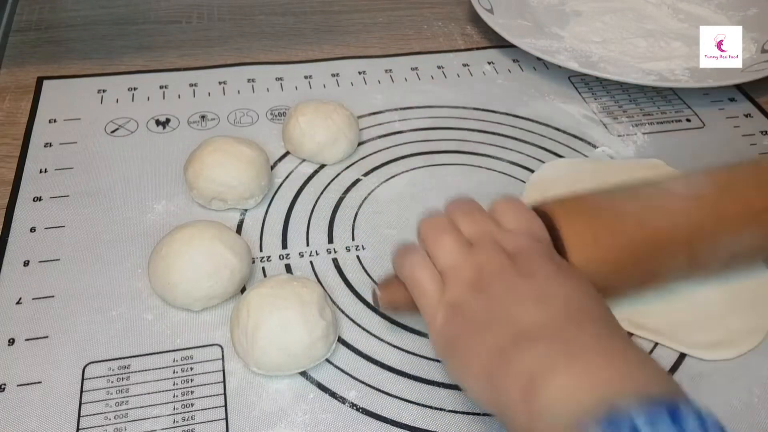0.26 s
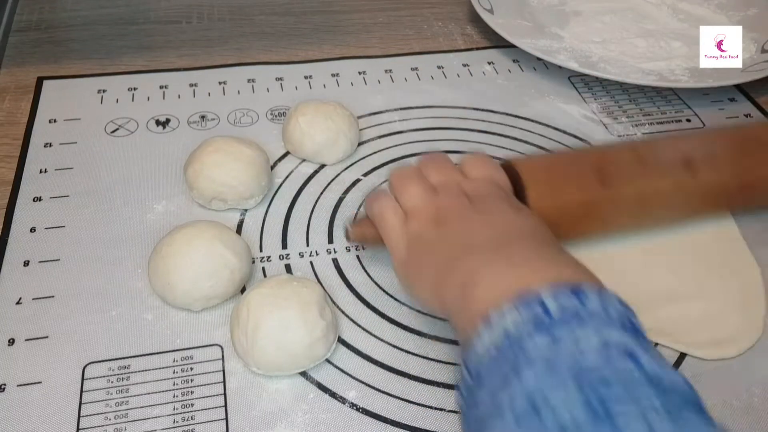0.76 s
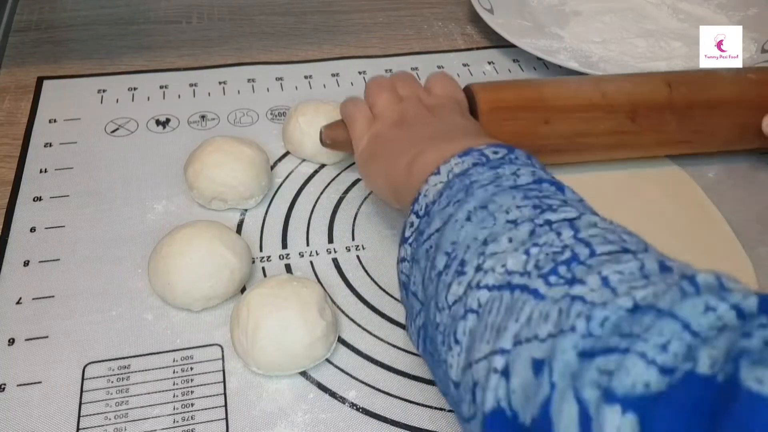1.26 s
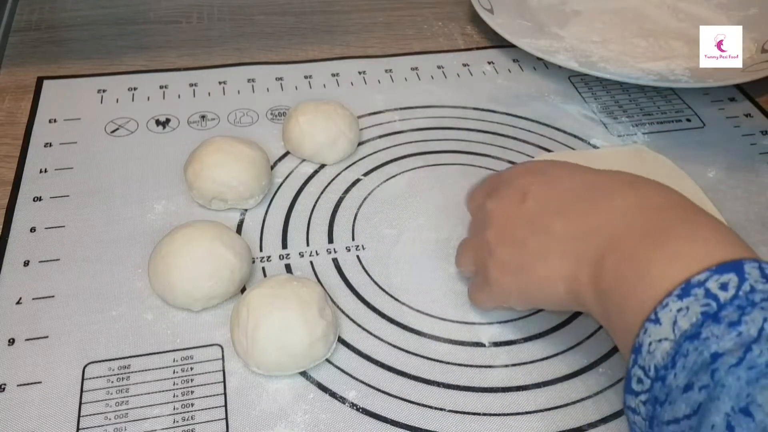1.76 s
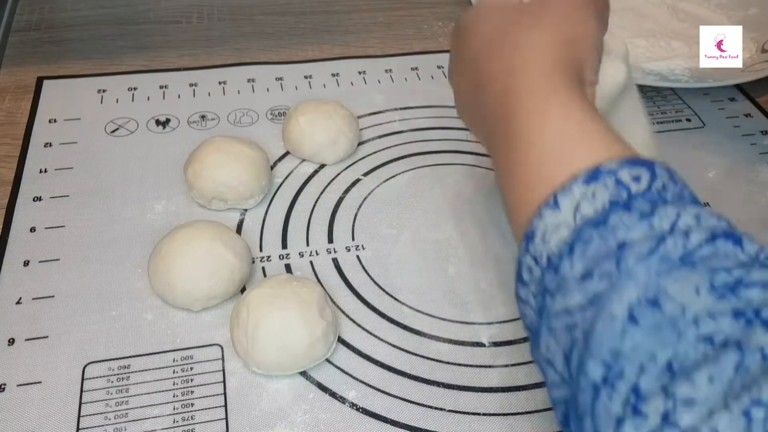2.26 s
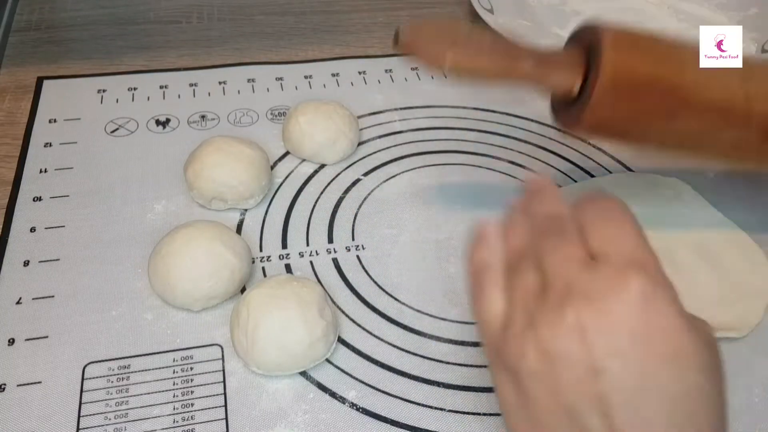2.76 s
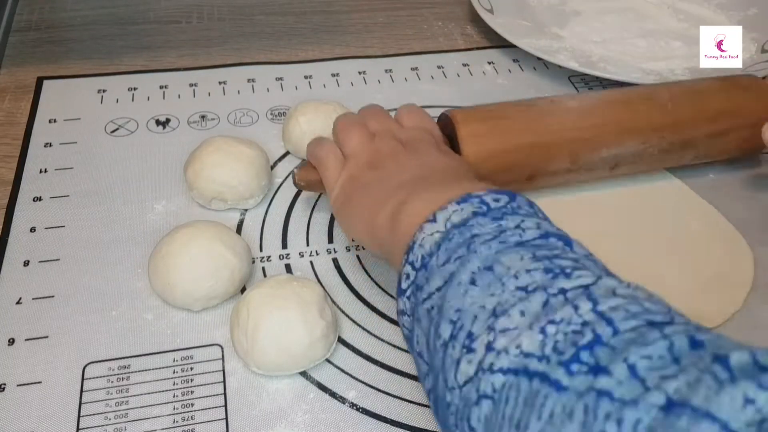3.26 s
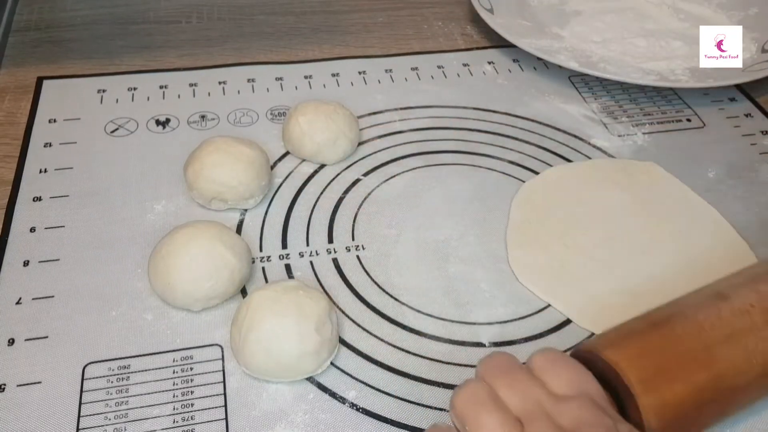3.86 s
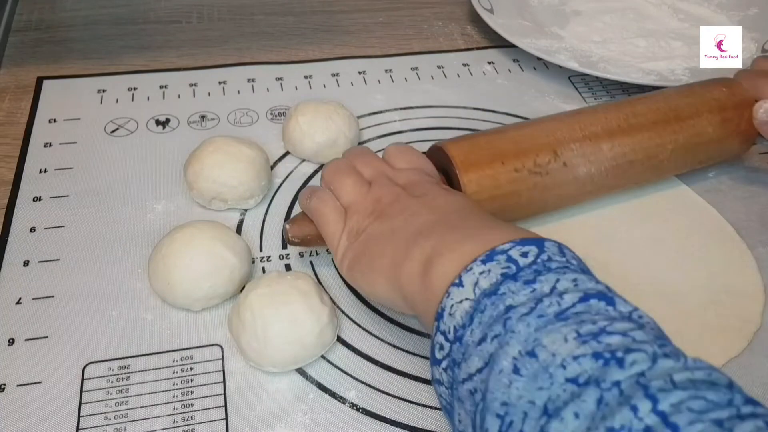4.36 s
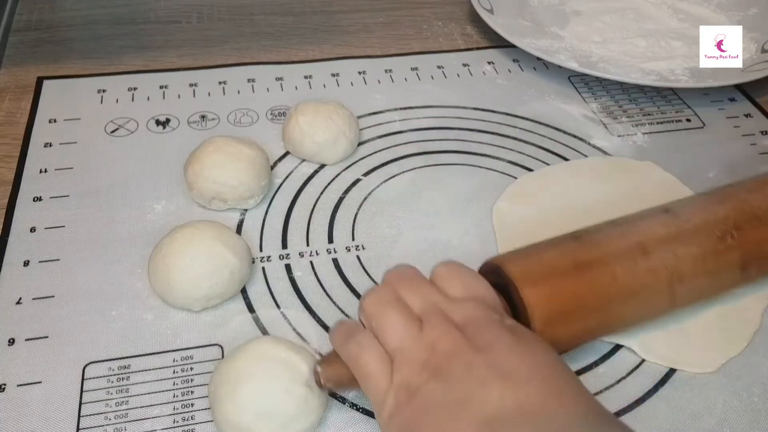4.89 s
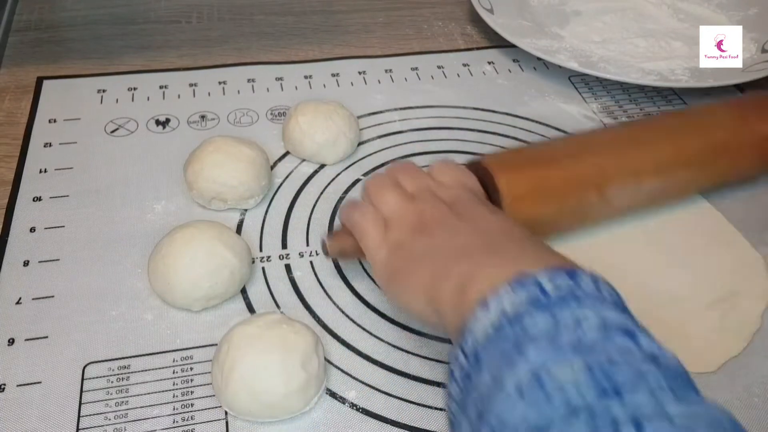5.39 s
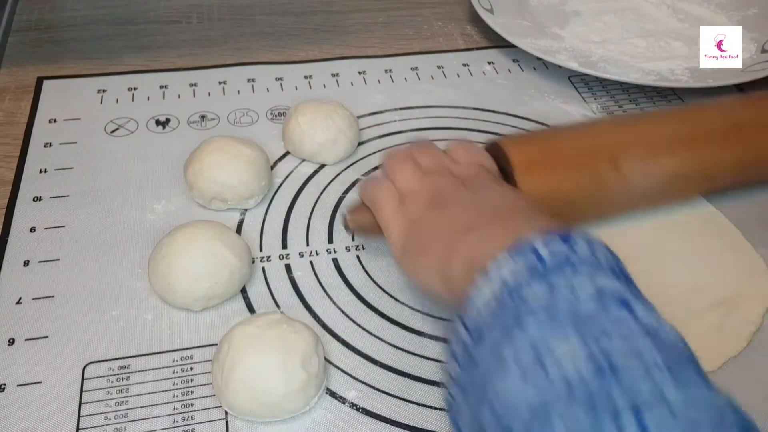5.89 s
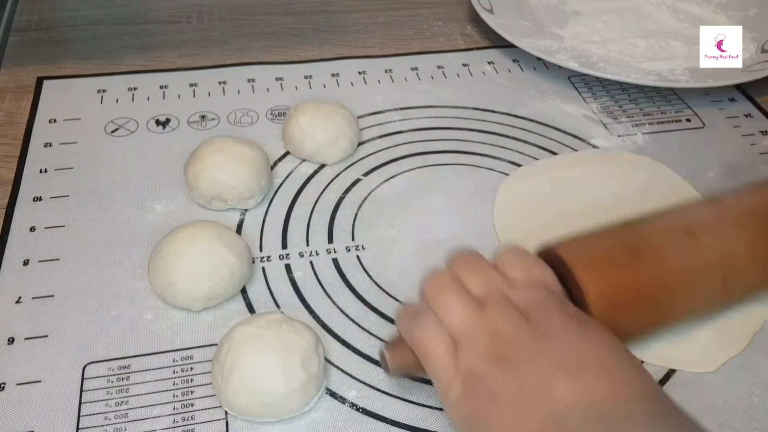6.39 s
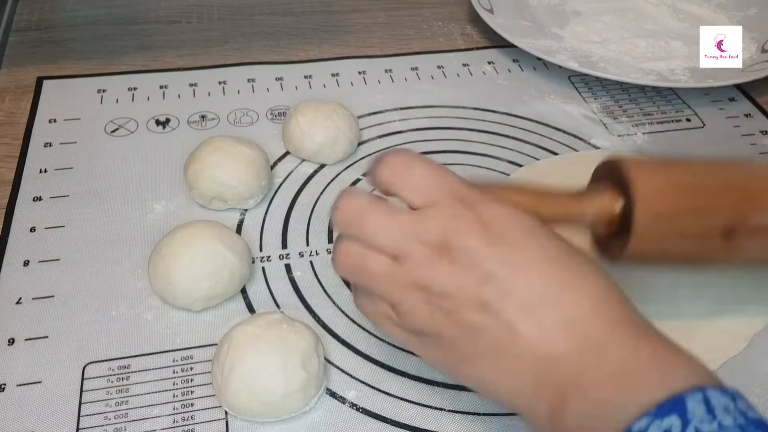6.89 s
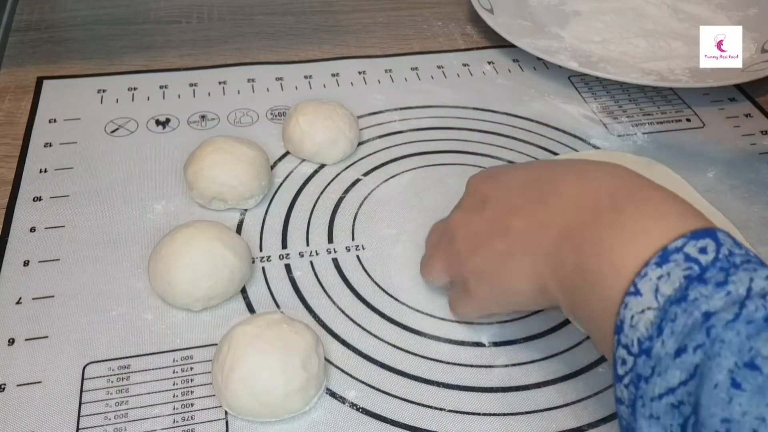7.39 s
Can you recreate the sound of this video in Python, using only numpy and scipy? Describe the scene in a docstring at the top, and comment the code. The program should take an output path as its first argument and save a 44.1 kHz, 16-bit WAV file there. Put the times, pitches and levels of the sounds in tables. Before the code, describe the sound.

A wooden rolling pin rumbles over dough in quick strokes, clacks and knocks on the counter midway, then rolls again with soft swishing.

```python
"""A small kitchen, a stereo pair close to the counter: a wooden pin rolls dough on a silicone mat. First come
quick strokes: the barrel rumbles and bumps over the dough, sleeve and floured mat swish. At 2 s the dough peels
off with a thin hiss and flops back. From 2.9 s the pin is set down and knocked: the wood clacks, the counter
booms, the room rings. At 4.6 s a longer bout of rolling starts; alongside it a soft band of hiss and a faint
narrow tone come and go. After 6.8 s the rolling gives way to a hand brushing the mat over the room's hush."""
import sys
import numpy as np
from scipy import signal
from scipy.fft import rfft, irfft, next_fast_len
from scipy.io import wavfile

SR = 44100
rng = np.random.default_rng(int(sys.argv[2]) if len(sys.argv) > 2 else 0)


def store_pcm(level_fs):
    """Save levels as 16-bit WAV."""
    pcm = np.round(np.clip(level_fs, -1, 1) * 32767).astype(np.int16)
    wavfile.write(sys.argv[1], SR, np.atleast_2d(pcm).T)


N = 336914


# one push or pull of the pin: middle_s, arm_length_s, rumble_db, rubbing_db
STROKES = [(0.061, 0.17, -53.5, -64.5), (0.232, 0.19, -54.5, -70), (0.412, .16, -58.5, -65),
           (0.589, 0.18, -54.5, -65.5), (0.786, 0.18, -60.5, -61), (0.956, 0.18, -58, -67.5),
           (1.158, .18, -57.5, -63), (1.26, 0.19, -67, -69.5), (3.209, .13, -53.5, -60.5),
           (4.65, 0.2, -62.5, -73), (4.807, 0.15, -58.5, -69), (5.006, 0.12, -56, -68),
           (5.2, 0.16, -58, -69.5), (5.386, 0.18, -56.5, -65.5), (5.576, 0.19, -52, -65.5),
           (5.779, .17, -54.5, -64), (5.965, .17, -51.5, -64.5), (6.146, 0.19, -57.5, -65.5),
           (6.229, 0.13, -59.5, -64.5), (6.38, 0.21, -53.5, -64), (6.56, 0.18, -56.5, -65.5),
           (6.744, 0.23, -59.5, -65)]
# a hand brushes the mat, shifting dough or pin: middle_s, length_s, rumble_db, rubbing_db, swish_db
HAND_MOVES = [(1.472, 0.28, -84, -74, -73), (1.729, 0.19, -66, -91, -93), (1.79, 0.19, -80, -94, -76),
              (2.02, 0.33, -83.5, -81, -72.5), (3.08, 0.38, -58.5, -73, -71.5), (3.32, 0.24, -62, -73, -73),
              (3.776, 0.72, -68.5, -73, -73.5), (4.482, 0.31, -69.5, -73.5, -65.5),
              (6.832, 0.36, -87, -67, -64), (7.047, .22, -84, -95, -75), (7.293, 0.39, -76.5, -88, -70.5),
              (7.457, 0.32, -79.5, -80, -70.5), (7.584, 0.12, -73.5, -76.5, -80)]
# spectra of the floured mat and of the sleeve: frequency_hz, density_db
MAT_COLOUR = [(400, -4.5), (700, -5.5), (1100, -3.5), (1750, 1), (2300, -7.5), (3000, -1.5), (4000, -6),
              (6000, -8), (10000, -52)]
SLEEVE_COLOUR = [(2000, -50), (4200, -6.5), (6500, 1), (9000, -1.5), (13000, -0.5), (16000, -4)]

def strokes(rumble_lag_s=0.0058, rumble_stretch=1.46, slide_stretch=1.78, swish_follows=0.68):
    """The arm's speed drives barrel, mat and sleeve; their sounds outlast each stroke and overlap."""
    s, length, rumble_db, rubbing_db = np.transpose(STROKES)
    hand_s, hand_length, hand_rumble_db, hand_rubbing_db, hand_swish_db = np.transpose(HAND_MOVES)
    swish_db = -68.5 + swish_follows * (rubbing_db - rubbing_db.mean())
    weight = swells(s + rumble_lag_s, length * rumble_stretch, rumble_db, power=1.8)
    weight += swells(hand_s, hand_length, hand_rumble_db, power=1.8)
    rub = swells(s, length * slide_stretch, rubbing_db, power=4.96)
    rub += swells(hand_s, hand_length, hand_rubbing_db, power=4.96)
    swish = swells(s, length * slide_stretch, swish_db, power=4.1)
    swish += swells(hand_s, hand_length, hand_swish_db, power=4.1)
    mat = friction(from_db(5.0) * rub, MAT_COLOUR, grain_db=1.0, patchy_db=1.5, pan_db=-2.5)
    sleeve = friction(from_db(5.5) * swish, SLEEVE_COLOUR, grain_db=1.0, patchy_db=1.0, pan_db=-2.0)
    return rolling(weight) + mat + sleeve


# spectrum of the barrel on dough and mat: frequency_hz, density_db
RUMBLE_COLOUR = [(20, 1.5), (45, 1.5), (100, 1.5), (150, -4), (210, -2), (300, -1.5), (450, -8.5),
                 (650, -8.5), (900, -20.5), (1400, -26), (2500, -23), (6000, -72.5)]
# how hard the hands lean on the counter: time_s, bass_gain_db
LEAN = [(0, 2), (1.3, 7.5), (1.75, 5.5), (3.3, 2.5), (4.7, -6), (5.7, -4.5), (6.3, 0.5), (6.7, -3.5),
        (7.3, -7), (7.6, 8.5)]

def rolling(weight, lumpy_db=0.5, mat_db=-0.5, counter_db=-6, deep_hz=140):
    """Uneven dough under the barrel shakes mat and counter, with more bass as the hands lean harder."""
    load = weight * rms_one(from_db(lumpy_db * flutter(35)))
    shake = load * rng.standard_normal(N)
    boom = rms_one(body(COUNTER_MODES, lambda hz: shake)) * np.std(shake)
    rumble = from_db(mat_db) * load * diffuse(RUMBLE_COLOUR) + from_db(counter_db) * boom
    bass = from_db(in_time(LEAN)) * cut(rumble, deep_hz, "low", order=3)
    return pan(bass + cut(rumble, deep_hz, "high", order=3), pan_db=-2.36)


# hard contacts of the pin: start_s, thump_db, thump_hz, knock_db, then wood_db in four zones, low to high
CLACKS = [(2.9335, -29, 95, -29.5, -19.5, -15.5, -8, -17),
          (3.482, -33.5, 148.6, -32, -14.5, -7.5, -13.5, -17.5),
          (3.4961, -60, 152, -50, -19.5, -12, -20, -45),
          (3.5518, -36.5, 103.5, -20.5, -21.5, -19.5, -16.5, -20),
          (4.0774, -26.5, 194.3, -26, -10.5, -13, -12.5, -9.5),
          (4.085, -49, 201, -35.5, -19.5, -12, -8.5, -17), (6.8005, -75, 300, -36, -19, -37.5, -21, -47.5)]
# the wood's bright ring and the hollow knock: pitch_hz, level_db, t60_s
WOOD_MODES = [(1479, -20, 0.072), (1620, -15, 0.05), (1670, -8.5, 0.015), (1877, -18.5, 0.12),
              (2128, -3.5, 0.0075), (2425, -12.5, 0.071), (2840, -6, 0.013), (2883, -5, .036),
              (3065, -5, 0.013), (3460, -6.5, .016), (3914, -9.5, 0.01), (4460, -10.5, 0.0094),
              (5506, -6.5, 0.013), (7794, -12, 0.014)]
HOLLOW_MODES = [(420, -6, 0.012), (558, -3, 0.062), (579.6, 4, 0.027), (619.6, 5, 0.0098),
                (770, -23, 0.0029), (1130, -9, 0.0028)]

def clacks(crack_db=21, zones_hz=(1860, 2400, 3200, 5130)):
    """Wood meets wood: where the pin is struck decides which modes answer; the counter booms below."""
    s, thump_db, thump_hz, knock_db, *wood_db = np.transpose(CLACKS)

    def blow(hz):
        return clicks(s, [at_hz(np.c_[zones_hz, row], hz) for row in np.transpose(wood_db)])

    wood = cut(body(WOOD_MODES, blow), 1100, "high")   # the slim barrel radiates little bass
    wood += from_db(crack_db) * crack(blow)
    hollow = body(HOLLOW_MODES, lambda hz: clicks(s, knock_db))
    counter = thumps(s, thump_db, thump_hz, octave_fall_db=7.5)
    return kitchen(wood + hollow, wet_db=-3.0, build_s=0.00097) + kitchen(counter, wet_db=-12.0)


# spectrum of the crack that opens a clack: frequency_hz, density_db
CRACK_COLOUR = [(800, -25), (1150, -16), (1550, 2), (2900, 7.5), (4000, -6), (6000, -11.5), (8000, -14),
                (9500, -20), (16000, -26)]

def crack(force_at, ring_s=0.0019):
    """Countless short-lived modes of the wood merge into a burst of noise, new for every blow."""
    fade = np.exp(-2 / (ring_s * SR))
    edges_hz = np.geomspace(800, 16000, 12)
    burst = 0
    for low, high in zip(edges_hz, edges_hz[1:]):
        hz = np.sqrt(low * high)
        energy = signal.lfilter([1 - fade], [1, -fade], force_at(hz) ** 2 + 1e-24)
        band = cut(np.sqrt(energy) * rng.standard_normal(N), [low, high], "band")
        burst += from_db(at_hz(CRACK_COLOUR, hz)) * band
    return burst


# resonances of the counter under the mat: pitch_hz, level_db, t60_s
COUNTER_MODES = [(43, -7.5, 0.42), (65, -5, 0.36), (84, -7, 0.23), (107.5, -0.5, .68), (111, -13, .22),
                 (139.9, -8.5, 0.5), (165.4, -10, 0.13), (196.5, 0.5, 0.33), (226, -10, 0.53),
                 (265, -14, 0.017), (318, -0.5, 0.34)]

def thumps(s, db, pitch_hz, octave_fall_db):
    """The counter booms, most strongly in the modes near the pitch of each thump."""
    return body(COUNTER_MODES, lambda hz: clicks(s, db - octave_fall_db * np.abs(np.log2(hz / pitch_hz))))


# barrel and hand bump on dough and mat: start_s, level_db, pitch_hz, t60_s, nudge_db
BUMPS = [(0.164, -44, 474, 0.0045, -50), (0.531, -46.5, 523, 0.0018, -56), (0.896, -50, 450, .005, -53),
         (1.138, -45.5, 363, .005, -62), (1.269, -42.5, 750, 0.0014, -69),
         (1.496, -45.5, 1200, 0.0026, -80), (1.563, -52.5, 450, 0.0071, -62.5),
         (1.687, -51, 248, 0.0087, -54), (3.0081, -47, 199, 0.023, -36), (3.1751, -47, 500, .006, -47),
         (3.826, -26.5, 475.7, 0.011, -51.5), (3.841, -32, 400, 0.017, -58.5),
         (3.858, -35, 516, 0.032, -60.5), (3.878, -44, 820, 0.014, -41.5), (6.112, -39, 950, 0.0036, -55),
         (6.224, -42, 670, 0.0053, -53), (6.327, -57, 300, .008, -52.5), (6.518, -41.5, 809, 0.0034, -91),
         (6.729, -48, 288, 0.013, -68.5)]

def bumps():
    """Cushioned contacts: a dull, briefly ringing pulse that also nudges the counter."""
    pulses = 0
    for s, db, hz, t60, _ in BUMPS:
        pulse = ring(clicks([s], 0), hz, t60)
        pulse = cut(pulse, 1.6 * hz, "low", order=6)
        pulse = cut(pulse, 0.5 * hz, "high", order=1)
        pulses += from_db(db) * pulse / np.abs(pulse).max()
    s, *_, nudge_db = np.transpose(BUMPS)
    return kitchen(pulses, wet_db=-3.0) + thumps(s, nudge_db, pitch_hz=107, octave_fall_db=10.0)


# small sharp ticks of the handle: start_s, level_db
TICKS = [(2.069, -44.5), (2.075, -50), (3.174, -41.5), (3.2633, -26.5), (6.4095, -27.5)]

def ticks(ring_s=0.0015):
    """The handle gives tiny bright snaps, over in a few milliseconds."""
    t = np.arange(SR // 50) / SR
    snap = cut(rng.standard_normal(len(t)) * np.exp(-t / ring_s), 4500, "high", order=1)
    snaps = np.convolve(clicks(*np.transpose(TICKS)), snap / np.abs(snap).max())[:N]
    return kitchen(snaps, wet_db=-4.0)


# spectrum of dough slapping the mat: frequency_hz, density_db
FLOP_COLOUR = [(40, -21), (150, -4.5), (350, -3.5), (500, -5), (700, -5), (950, -5.5), (1300, -1.5),
               (1750, 0.5), (2300, -3.5), (3300, -9), (5000, -17), (9000, -22), (16000, -28)]

def flop(land_s=2.486, slap_db=-38, attack_s=0.0051, decay_s=0.012, settle_s=0.012):
    """Soft dough lands: a dull slap that spreads over a few milliseconds and nudges the counter."""
    t = np.arange(N) / SR - land_s
    envelope = np.exp(-np.maximum(-t / attack_s, t / decay_s))
    slap = from_db(slap_db) * envelope * diffuse(FLOP_COLOUR)[0]
    counter = thumps([land_s + settle_s], db=-48.5, pitch_hz=115, octave_fall_db=3.5)
    return pan(kitchen(slap, wet_db=-8.0), pan_db=-1.0) + counter


# spectrum of the soft band of hiss: frequency_hz, density_db
SOFT_BAND_COLOUR = [(450, -17), (700, 2), (1050, -8), (1400, 0), (1700, -9), (1900, -5.5), (2300, -18),
                    (4000, -14)]

def soft_band():
    """Off to the right a soft, dry band of hiss rises, holds and fades."""
    level = held(start_s=4.58, end_s=5.3, db=-63, attack_s=0.092, release_s=0.062)
    return friction(level, SOFT_BAND_COLOUR, grain_db=1.0, patchy_db=4.0, pan_db=-9.0)


# drift of the narrow band: time_s, pitch_hz
NARROW_BAND_PITCH = [(4.62, 1550), (4.66, 1478), (4.762, 1660), (5.23, 1480), (5.35, 1581), (6.01, 1635),
                     (6.22, 1522)]

def narrow_band(start_s=4.6, waver_hz=14.1, width_hz=220, growth_db_per_s=8):
    """A narrow noise band stands out of the soft hiss and outlasts it, drifting and growing."""
    hz = in_time(NARROW_BAND_PITCH) + waver_hz * flutter(11.96)
    noise = rng.standard_normal((2, N)) + 1j * rng.standard_normal((2, N))
    wobble = cut(noise, width_hz / 2, "low")
    band = rms_one(np.real(wobble * np.exp(2j * np.pi * np.cumsum(hz) / SR)))
    level = held(start_s, end_s=6.25, db=-74.5, attack_s=0.028, release_s=0.06)
    growth = from_db(growth_db_per_s * (np.arange(N) / SR - start_s))
    return pan(level * growth * band, pan_db=-6.5)


# spectrum of dough leaving the mat: frequency_hz, density_db
PEEL_COLOUR = [(40, -25), (150, -6), (330, 8), (700, -15), (2000, -12), (2600, -2), (3600, -15),
               (4400, 6.5), (4900, 3), (5500, -7), (6300, 1), (8500, -18), (13000, -8)]

def peel():
    """The dough peels off the mat with a thin hiss, mostly in the right microphone."""
    level = held(start_s=2.04, end_s=2.47, db=-77, attack_s=0.25, release_s=0.027)
    return friction(level, PEEL_COLOUR, grain_db=3.0, patchy_db=0.5, pan_db=-14.5)


# reverberation of the small kitchen: frequency_hz, t60_s
ROOM_DECAY = [(100, 0.47), (500, 0.42), (1500, 0.35), (3000, 0.3), (5500, 0.21), (8000, 0.14),
              (14000, 0.094)]
# direct sound of a contact at the two microphones: frequency_hz, left_minus_right_db
MIC_BALANCE = [(100, 2), (250, 1.5), (550, -5.5), (1100, 1), (1700, 11), (2300, 7), (3000, -9), (5000, -7),
               (9000, -9.5), (15000, 0)]

def kitchen(x, wet_db, build_s=0.0032, left_lag_s=0.00017):
    """Direct sound reaches the right microphone first; dense reflections follow, the treble dying first."""
    t = np.arange(SR * 3 // 4) / SR
    white = rfft(diffuse([(20, 0), (20000, 0)], size=len(t)), SR)
    hz, centres = np.fft.rfftfreq(SR, 1 / SR), np.array(ROOM_DECAY)[:, 0]
    tail = 0
    for share, (_, t60) in zip(np.eye(len(ROOM_DECAY)), ROOM_DECAY):
        band = irfft(white * at_hz(np.c_[centres, share], hz), SR)[:, :len(t)]
        tail += band * from_db(-60 * t / t60)
    tail *= 1 - np.exp(-(t / build_s) ** 2)
    tail = pan(tail / np.sqrt(np.sum(tail ** 2) / 2), pan_db=-0.2)
    length = next_fast_len(N + SR, True)
    hz = np.fft.rfftfreq(length, 1 / SR)
    delay = np.exp(-2j * np.pi * hz * left_lag_s)
    direct = pan(np.array([delay, np.ones_like(delay)]), at_hz(MIC_BALANCE, hz))
    response = direct + from_db(wet_db) * rfft(tail, length)
    return irfft(rfft(x, length) * response, length)[:, :N]


# spectrum of the kitchen's room tone: frequency_hz, density_db
HUSH_COLOUR = [(20, -15), (50, -6), (105, -0.5), (160, -7.5), (260, -16.5), (318, -0.5), (400, -18.5),
               (510, -10), (800, -15), (1600, -18.5), (3200, -22), (8500, -22.5), (12500, -13),
               (16000, -16.5)]

def hush(level_db=-68.5):
    """Faint, steady room tone all around the microphones."""
    return from_db(level_db) * diffuse(HUSH_COLOUR)


# how alike the two microphones hear diffuse sound: frequency_hz, correlation
MIC_LIKENESS = [(60, 0.95), (300, .88), (640, 0.37), (1400, 0), (3000, 0), (15000, 0)]

def diffuse(colour, size=N):
    """Coloured stereo noise, alike on both sides in the bass only; rms 1."""
    length = next_fast_len(size, True)
    hz = np.fft.rfftfreq(length, 1 / SR)
    mid, side = rfft(rng.standard_normal((2, length)))
    alike = np.clip(at_hz(MIC_LIKENESS, hz), -1, 1)
    both = np.sqrt(1 + alike) * mid + np.sqrt(1 - alike) * side * [[1], [-1]]
    return rms_one(irfft(both * from_db(at_hz(colour, hz)), length)[:, :size])


def friction(level, colour, grain_db, patchy_db, pan_db):
    """Sliding surfaces catch and let go: a soft hiss with a fine grain."""
    grain = rms_one(from_db(grain_db * flutter(570) + patchy_db * flutter(32)))
    return pan(level * grain * diffuse(colour), pan_db)


def swells(middles_s, lengths_s, levels_db, power):
    """Gain of arm movements: the speed of each is half a sine, and the sound grows as a power of it."""
    t, energy = np.arange(N) / SR, np.zeros(N)
    for s, length, db in zip(middles_s, lengths_s, levels_db):
        moving = np.abs(t - s) < length / 2
        speed = np.abs(np.cos(np.pi * (t[moving] - s) / length))
        energy[moving] += (from_db(db) * speed ** power) ** 2
    return np.sqrt(energy)


def held(start_s, end_s, db, attack_s, release_s):
    """Gain that rises, holds and falls."""
    t = np.arange(N) / SR
    return from_db(db) * np.clip(np.minimum((t - start_s) / attack_s, (end_s - t) / release_s), 0, 1)


def body(modes, force_at):
    """Modes in parallel with alternating signs, each driven by the force at its own frequency."""
    return sum((-1) ** k * from_db(db) * ring(force_at(hz), hz, t60)
               for k, (hz, db, t60) in enumerate(modes))


def ring(force, hz, t60):
    """A unit click sets a sine of height 1 ringing."""
    decay, angle = from_db(-60 / (t60 * SR)), 2 * np.pi * hz / SR
    return signal.lfilter([0, np.sin(angle)], [1, -2 * decay * np.cos(angle), decay ** 2], force + 1e-18)


def clicks(times_s, db):
    """One impulse per contact."""
    force = np.zeros(N)
    force[np.round(np.asarray(times_s) * SR).astype(int)] = from_db(db)
    return force


def flutter(rate_hz):
    """Smooth random wavering; rms 1."""
    return rms_one(cut(rng.standard_normal(2 * N), rate_hz, "low")[N:])


def in_time(points):
    """Join a table's points in time by straight lines."""
    return np.interp(np.arange(N) / SR, *np.transpose(points))


def at_hz(points, hz):
    """Read a table on a log-frequency axis."""
    points_hz, value = np.transpose(points)
    return np.interp(np.log(np.maximum(hz, 1)), np.log(points_hz), value)


def cut(x, hz, kind, order=2):
    """Butterworth filter."""
    sections = signal.butter(order, np.clip(hz, 10, .45 * SR), kind, fs=SR, output="sos")
    return signal.sosfilt(sections, x + 1e-18)


def pan(x, pan_db):
    """Left louder than right by pan_db."""
    return x * from_db(np.array([[1], [-1]]) * pan_db / 2)


def from_db(db):
    """Decibels to gain."""
    return 10 ** (np.asarray(db) / 20)


def rms_one(x):
    """Scale to unit rms."""
    return x / np.sqrt(np.mean(x ** 2) + 1e-20)


def scene():
    """Pin and dough close by on the counter, the hush of the kitchen behind."""
    return strokes() + clacks() + bumps() + ticks() + flop() + soft_band() + narrow_band() + peel() + hush()


def record(dry, ceiling=0.7, cutoff_hz=16100):
    """The highest peaks are rounded and the top treble is cut steeply."""
    rounded = ceiling * np.tanh(dry / ceiling)
    return signal.sosfilt(signal.ellip(12, .1, 80, cutoff_hz, fs=SR, output="sos"), rounded)


dry = scene()
out = record(dry)
store_pcm(out)
```